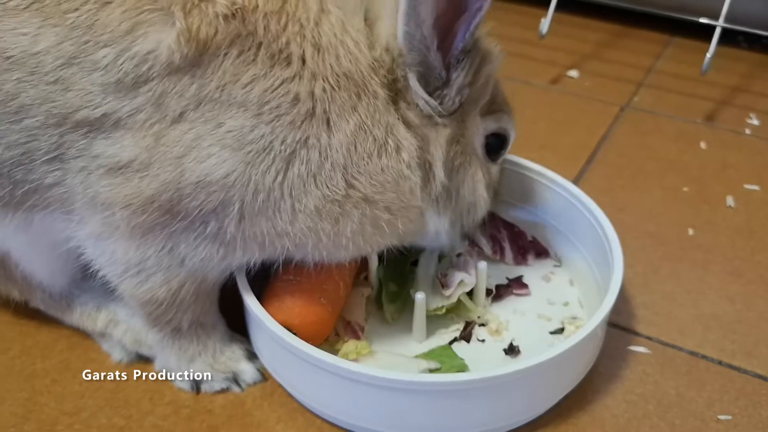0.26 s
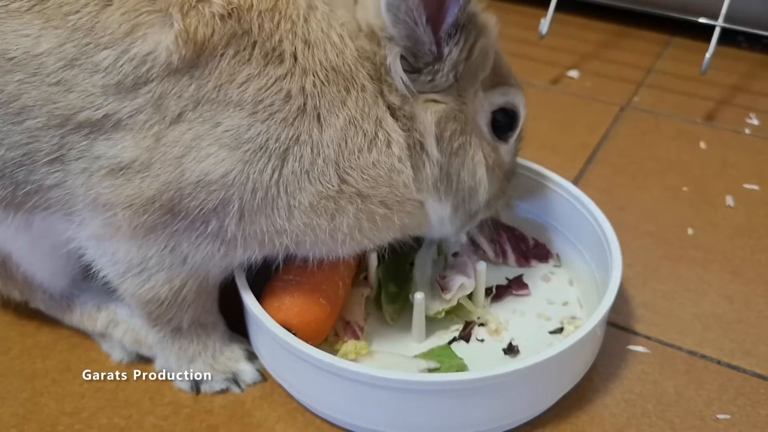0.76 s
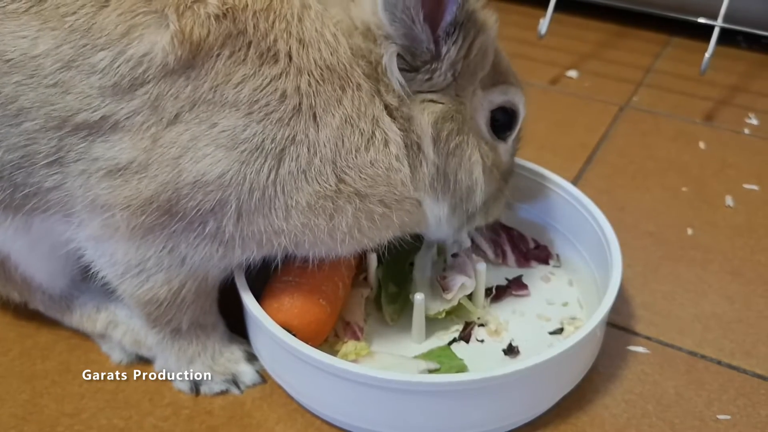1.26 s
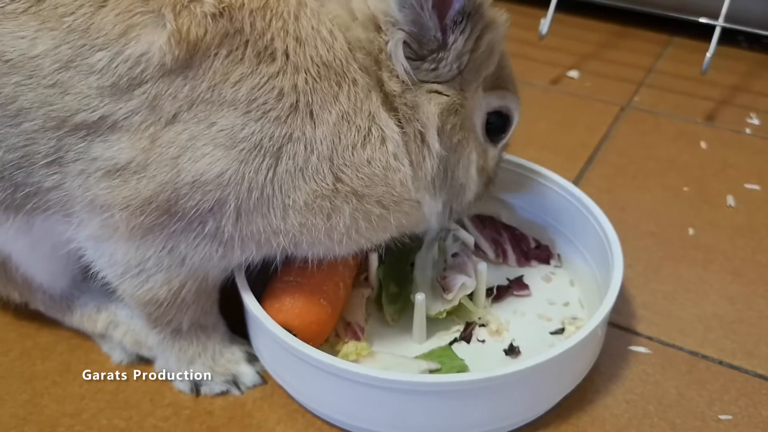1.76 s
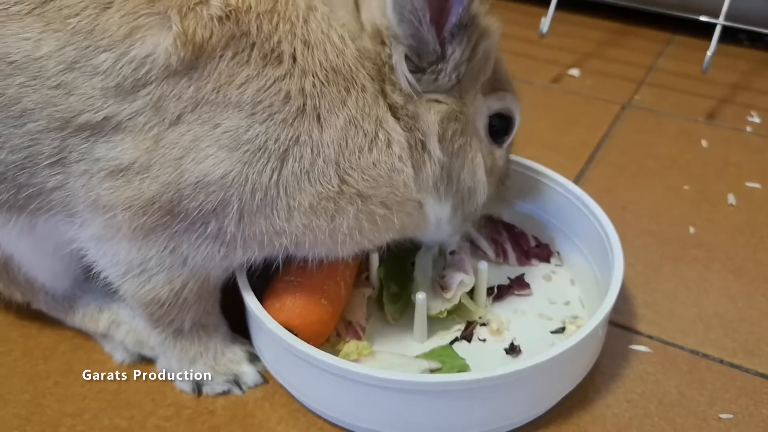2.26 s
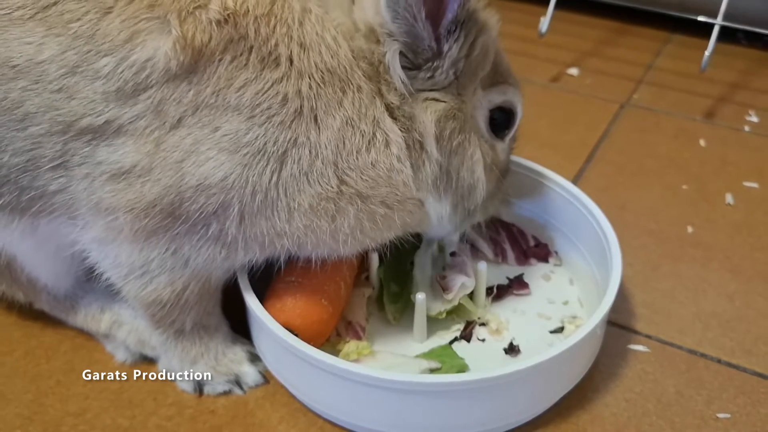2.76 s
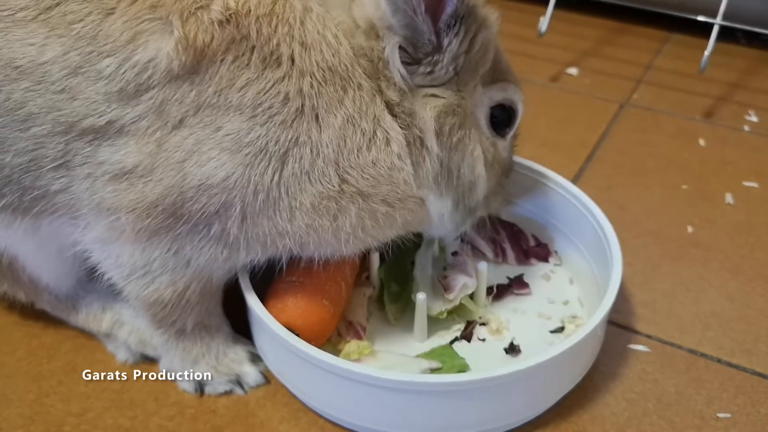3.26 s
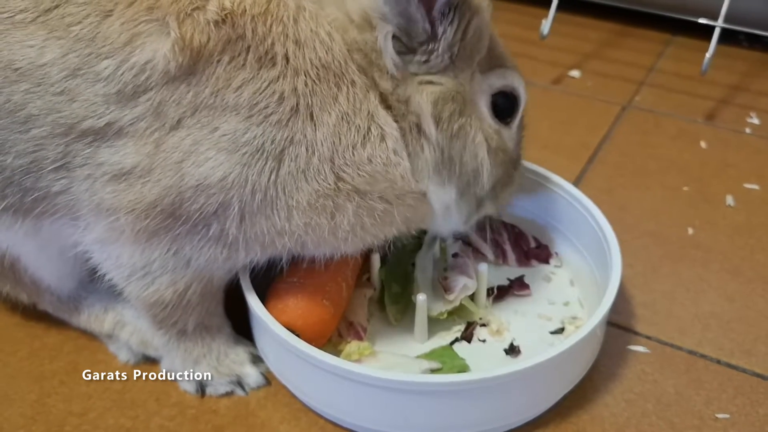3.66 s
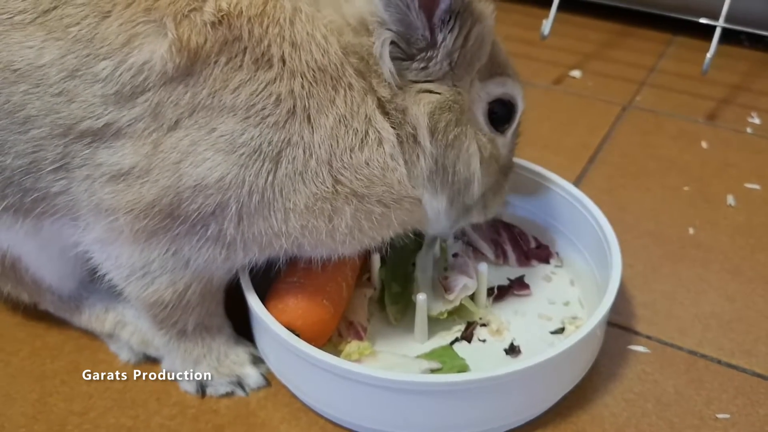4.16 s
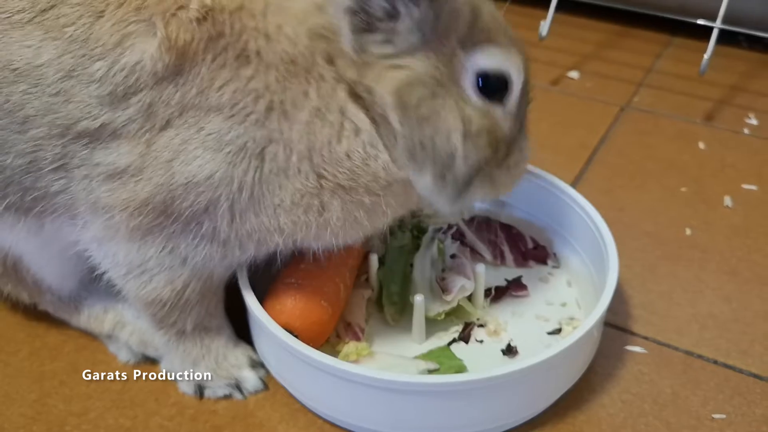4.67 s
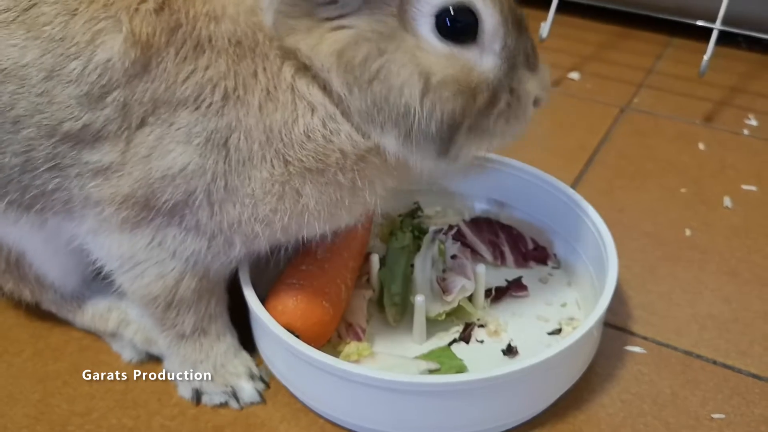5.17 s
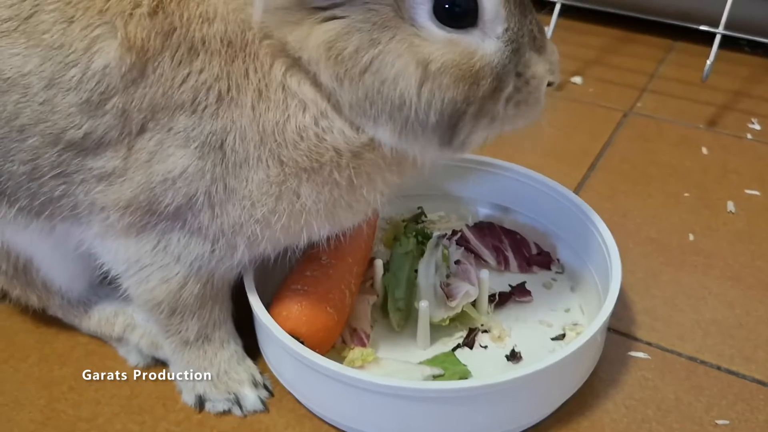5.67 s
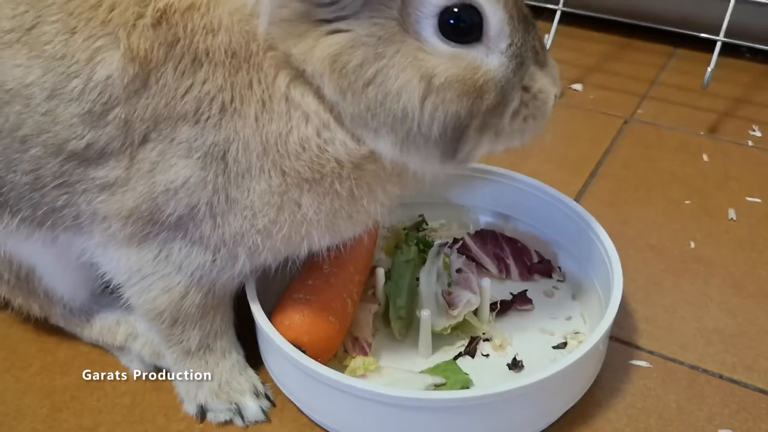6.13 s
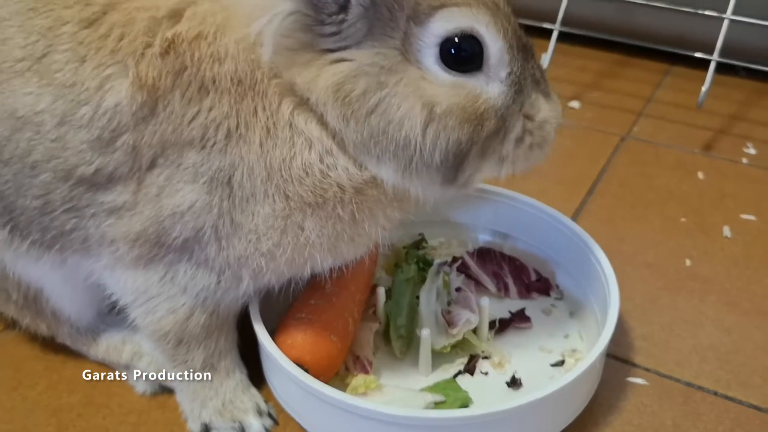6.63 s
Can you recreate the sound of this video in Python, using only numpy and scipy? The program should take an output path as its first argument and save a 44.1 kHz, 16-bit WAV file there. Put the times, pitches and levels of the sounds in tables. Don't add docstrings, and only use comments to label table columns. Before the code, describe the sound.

A rabbit eats salad from a plastic bowl on a tiled floor, very close to a small stereo microphone. Loud brittle crunches come in the first second, then a faint lull; firm bites and bright fibre snaps return from two seconds. After about five seconds only soft grinding, dull tooth knocks and small wet clicks remain. Deep distant traffic rumble and soft hiss run throughout.

```python
import sys
import numpy as np
from scipy import signal
from scipy.fft import rfft, irfft
from scipy.io import wavfile
from scipy.ndimage import uniform_filter1d

SR = 44100
rng = np.random.default_rng(int(sys.argv[2]) if len(sys.argv) > 2 else 0)


def store_pcm(level_fs):
    pcm = np.round(np.clip(level_fs, -1, 1) * 32767).astype(np.int16)
    wavfile.write(sys.argv[1], SR, np.atleast_2d(pcm).T)


def undo_db(level):
    steps = np.asarray(level, float) / 20
    return 10 ** steps


N = 304283

# mode_hz, width_hz, level_db
BOWL = [(2650, 82, 1), (3870, 410, -3), (5030, 130, -3), (5700, 120, 0), (7300, 220, 5), (8500, 660, -3.5)]
BRITTLE = (-30, -6)


def evened(x):
    return x / np.sqrt(np.mean(x ** 2) + 1e-20)


def read(points, hz):
    f, value = np.transpose(points)
    return np.interp(np.log(hz + 1), np.log(f + 1), value)


def add(mix, s, sound):
    part = mix[..., round(s * SR):][..., :sound.shape[-1]]
    part += sound[..., :part.shape[-1]]


def resonate(x, hz, width):
    turn = np.exp(2j * np.pi * hz * np.arange(x.shape[-1]) / SR)
    r = np.exp(-np.pi * width / SR)
    return 2 * (turn * signal.lfilter([1 - r], [1, -r], x / turn)).real


def cracks(shape, per_s, spread_db):
    size = undo_db(spread_db * np.minimum(rng.exponential(1, shape), 2.8))
    size = size * rng.choice([-1., 1.], shape)
    return size * (rng.random(shape) < per_s / SR)


def air(level_db=-54, patchy_db=1.6):
    # pitch_hz, density_db
    air_spectrum = [(8.8, -31), (15, -1.5), (59, -7), (102, -15.5), (141, -11.5), (477, -27.5),
                    (1760, -25.5), (4340, -33.5), (14300, -40.5), (15600, -39)]
    # pitch_hz, likeness (-1 to 1)
    coherence = [(60, 0.98), (150, 0.92), (380, -0.1), (950, -0.22), (2380, 0.22), (5980, -0.26),
                 (15000, -0.05)]
    # pitch_hz, width_hz, level_db
    housing = [(1330, 170, -2.5), (1750, 170, 1.5), (2650, 110, 1.2)]
    frames, hz = N // 512 + 5, np.fft.rfftfreq(2048, 1 / SR)
    a, b, c, d, patches = rng.standard_normal((frames, 1025, 5)).T
    patches = evened(uniform_filter1d(uniform_filter1d(patches, 20, 0), 8, 1))
    same = np.clip(read(coherence, hz), -1, 1)[:, None]
    left = a + 1j * b
    right = same * left + np.sqrt(1 - same ** 2) * (c + 1j * d)
    colour_db = read(air_spectrum, hz) + sum(db * np.exp(-((hz - f) / w) ** 2) for f, w, db in housing)
    z = np.array([left, right]) * undo_db(colour_db[:, None] + patchy_db * patches)
    return undo_db(level_db) * evened(signal.istft(z, nperseg=2048, noverlap=1536)[1][:, :N])


def traffic(steadiness=0.91, fade_db=11.5):
    # mode_hz, width_hz
    hum_modes = [(25, 5.8), (47, 12), (68, 7.7), (128, 10.3), (78, 9), (146, 14)]
    steady_levels = [-58, -61.5, -61, -68, -72, -72]
    # peak_s, half_length_s, peak_db, mode_hz
    passes = [(0.0, 0.054, -43.5, 25), (0.55, 0.37, -57, 25), (2.18, 0.087, -44, 25), (2.5, 0.24, -43, 25),
              (3.423, 0.34, -42.5, 25), (3.967, 0.1, -47, 25), (5.1, .35, -53.5, 25),
              (5.667, 0.078, -47, 25), (6.13, 0.15, -45.5, 25), (6.65, 0.16, -48, 25),
              (1.7, 0.19, -50.5, 47), (1.946, 0.15, -49.5, 47), (2.27, 0.21, -53, 47),
              (2.88, 0.22, -50, 47), (3.59, 0.16, -49, 47), (4.047, 0.056, -45.5, 47),
              (5.67, 0.11, -51, 47), (6.42, 0.18, -52.5, 47), (6.69, 0.096, -54.5, 47),
              (1.066, 0.1, -42, 68), (1.46, 0.4, -52, 68), (5.093, 0.084, -50.5, 68),
              (2.958, 0.18, -50.5, 68), (4.7, 0.15, -51.5, 78), (4.3, .15, -55, 68), (3.75, .1, -55, 68),
              (5.68, 0.34, -52, 68), (6.596, 0.13, -50.5, 68), (0.2, 0.24, -56, 128),
              (2.85, 0.12, -59, 128), (3.8, .12, -61, 128), (3.58, 0.08, -58, 128), (3.52, 0.1, -55, 146),
              (3.95, .1, -62, 146), (3.35, .08, -61, 146), (4.334, 0.3, -56.5, 128)]
    t, out = np.arange(N // 256 + 2) * 256 / SR, np.zeros(N)
    for (hz, width), steady_db in zip(hum_modes, steady_levels):
        ring = resonate(resonate(rng.standard_normal(N), hz, width), hz, width)
        beat = np.sqrt(abs(uniform_filter1d(evened(ring) ** 2, size=2600)) + 0.015)
        swells = [undo_db(db - fade_db * ((t - s) / half) ** 2)
                  for s, half, db, f in passes if abs(f - hz) < hz / 14]
        level = np.sqrt(undo_db(steady_db) ** 2 + sum(np.square(swells)))
        out += np.interp(np.arange(N) / SR, t, level) * evened(ring / beat ** steadiness)
    return out


def room(x, wet_db=-13.5):
    # pitch_hz, t60_s
    decay = [(500, 0.21), (1500, 1), (2700, .8), (5200, 0.42), (8000, 0.45), (15000, 0.4)]
    # delay_s, level_db
    reflections = [
        [(.0011, -49), (.0026, -16.5), (.0047, -39)],
        [(.0007, -16), (.0032, -10), (.0058, -12.5)],
    ]
    taps = np.zeros((2, SR // 2))
    at = np.arange(300, SR // 2 - 20, 20) + rng.integers(0, 20, (2, (SR // 2 - 301) // 20))
    np.put_along_axis(taps, at, rng.choice([-1., 1.], at.shape), 1)
    hz, t, z = signal.stft(taps, SR, nperseg=256)
    tail = signal.istft(z * undo_db(-60 * t / read(decay, hz)[:, None]), SR, nperseg=256)[1]
    tail = undo_db(wet_db) * tail / np.linalg.norm(tail[0])
    tail[:, 0] = 1
    for side, echoes in enumerate(reflections):
        for s, db in echoes:
            tail[side, round(s * SR)] -= undo_db(db)
    return signal.fftconvolve(x, tail, axes=1)[:, :N]


def bowl_lift(hz, db):
    return sum(undo_db(db + g) / np.sqrt(1 + ((hz - f) / w) ** 2) for f, w, g in BOWL)


def breaks():
    # start_s, peak_db, ring_hz, left_right_db
    dry_snaps = [(0.5546, -20, 7700, 4.5), (0.5557, -24, 4900, -3), (0.5553, -29.5, 2650, -9),
                 (0.6028, -27.5, 3750, -6), (0.8552, -28.5, 3300, -10), (0.588, -22.5, 7700, 0.5),
                 (0.6033, -21, 7360, -3), (0.7865, -23, 7100, -3), (0.8556, -24, 5400, -3),
                 (0.8788, -37, 7300, 0), (0.8965, -43, 7300, -4), (2.2853, -41, 8000, 4),
                 (2.3018, -30, 5150, -6), (2.3172, -33, 6500, -1), (2.352, -40, 6100, -5),
                 (2.4867, -37, 7800, -3), (2.51, -36, 5300, -9), (2.5345, -28, 7800, -3),
                 (2.7, -23.5, 5040, -6), (3.103, -41, 4830, 1), (3.4842, -42, 11500, -4),
                 (3.933, -33.5, 6260, -8), (4.0847, -45, 6960, 1.5), (4.131, -36, 7850, -2),
                 (4.3532, -28, 5800, -2), (4.6006, -33.5, 7160, -2), (4.742, -38, 6340, -4),
                 (5.855, -43.5, 9080, 1), (6.3677, -41.5, 6200, -9)]
    # start_s, peak_db, ring_hz, left_right_db
    juicy_snaps = [(0.7865, -28, 5030, -6), (1.2295, -45, 7300, -5), (1.2582, -38.5, 6660, -7),
                   (2.2567, -41, 8950, -2), (2.4703, -41, 7240, 1), (2.6642, -25.5, 5030, -3),
                   (3.07, -41.5, 7550, 1), (3.453, -41, 7700, 5), (3.677, -43, 9200, -9),
                   (3.6985, -34, 8000, -3), (3.721, -36, 7600, -2), (3.8691, -40, 11560, -2),
                   (3.8897, -29.5, 7800, -1), (3.9174, -38, 7100, 3), (4.122, -37, 7300, -6),
                   (4.304, -43, 6950, 6), (4.327, -27, 7200, 2), (4.559, -31.5, 10600, -7),
                   (4.651, -45, 8860, -9), (6.6322, -48, 5630, -7)]
    # start_s, peak_db, ring_hz
    ticks = [(0.9636, -41.5, 6800), (1.031, -48, 4960), (1.0679, -45, 2930), (2.096, -44.5, 4800),
             (2.3789, -43, 8800), (2.617, -49, 5000), (2.646, -50, 6000), (2.679, -42, 5120),
             (2.847, -48, 4300), (2.894, -46, 8800), (3.039, -46, 6000), (3.281, -38, 7600),
             (3.5857, -56, 5000), (3.8081, -53, 4530), (4.049, -52, 6730), (4.1057, -43, 7500),
             (4.7017, -45.5, 4150), (5.8806, -44, 8600), (6.1074, -52, 5480), (6.4892, -50, 5600),
             (6.8594, -54, 9000)]
    # start_s, peak_db
    creak = [
        (3.312, -47),
        (3.318, -48),
        (3.326, -46),
        (3.3325, -38.5),
        (3.337, -42.5),
    ]
    # start_s, peak_db
    smacks = [(4.2375, -55), (5.173, -50), (5.391, -50.5), (5.735, -52), (6.2386, -57), (6.3474, -60),
              (6.595, -55)]
    # start_s, peak_db, ring_hz
    crackles = [(0.5378, -41, 6430), (0.552, -29, 6500), (0.5553, -18.5, 5850), (0.5883, -26, 5000),
                (0.611, -28.5, 7500), (0.6155, -29, 7850), (0.618, -38, 3500), (0.7715, -36, 4010),
                (0.7715, -38, 7800), (0.7832, -27.5, 6900), (0.786, -28, 9000), (0.7935, -31, 5200),
                (0.802, -39, 7500), (0.8557, -30, 7840), (0.8792, -39, 3500), (2.2565, -40, 5500),
                (2.2865, -36, 4600), (2.535, -31.5, 5200), (2.6657, -33, 7200), (2.6985, -30, 7500),
                (2.7005, -28, 6500), (2.7165, -45, 7500), (3.4603, -41, 9000), (3.49, -42, 11000),
                (3.5869, -51, 8800), (3.603, -55, 9500), (3.8084, -50, 8800), (3.911, -44, 9000),
                (4.0912, -42, 7140), (4.2678, -54, 9000), (4.3095, -37, 6960), (4.344, -36, 9000),
                (4.362, -37, 6500), (4.5237, -46, 8760), (4.538, -39, 9000), (4.5595, -33, 7500),
                (4.567, -32, 9200), (4.572, -30, 9500), (4.577, -37, 8800), (4.6539, -43, 9000),
                (5.0197, -52, 4590), (5.2362, -55, 3740), (5.7136, -57, 3730), (5.738, -51, 8800),
                (5.904, -54, 9000), (5.992, -55, 9000), (6.215, -59, 4100), (6.2374, -50, 5840),
                (6.3542, -51, 9100), (6.5, -52, 5500), (6.602, -53, 9000), (6.745, -52, 5800),
                (6.762, -53, 9000), (6.795, -52, 5500)]
    # start_s, peak_db, ring_hz
    knocks = [(0.783, -45, 1390), (3.669, -50, 1320), (3.677, -39.5, 1430), (3.699, -45, 1670),
              (3.869, -51, 1560), (3.885, -44, 1310), (4.092, -48, 1650), (4.123, -43.5, 1470),
              (4.295, -50, 1690), (4.318, -43, 1800), (4.328, -40, 1700), (4.543, -48, 1730),
              (4.567, -43, 1660), (4.575, -40, 1500), (5.24, -55, 950), (5.485, -60, 906),
              (5.65, -56.5, 900), (5.71, -55, 885), (5.75, -61, 850), (5.96, -57.5, 900), (6.203, -52, 900),
              (6.225, -56, 1000), (6.26, -55.5, 950), (6.48, -54, 950), (6.65, -55, 1100),
              (6.702, -53, 895), (6.725, -52, 800), (6.745, -55, 900)]
    # start_s, peak_db, ring_hz, left_right_db
    splits = [(0.5555, -24, 7000, 3), (0.6035, -28, 6000, 0), (0.7868, -24.5, 7500, 2),
              (0.8792, -33, 7500, 0), (2.3015, -34, 9500, -2), (2.3175, -40, 4000, -2),
              (2.429, -50, 1500, -2), (2.4697, -42, 4000, -1), (2.487, -34.5, 11000, -4),
              (2.509, -36, 4000, -2), (3.3185, -48, 7600, -2), (3.326, -47, 7600, -2),
              (3.3325, -46, 7600, -2), (3.338, -44, 7600, -2), (3.4535, -42, 11000, -3),
              (3.704, -42, 8000, -2), (3.7155, -43, 9000, -2), (3.89, -34, 12000, 0), (3.934, -40, 3000, 2),
              (4.3285, -38, 11000, -1), (4.344, -38, 13000, -3), (4.354, -38, 8500, -2),
              (4.557, -37, 10600, -4), (5.24, -56, 1750, -3), (5.52, -56, 1700, -3), (5.99, -56, 2050, -3),
              (6.217, -53, 1750, -3), (6.288, -53, 1750, -3), (4.328, -50, 1000, -3), (4.36, -48, 1100, -3),
              (5.215, -55, 900, -3), (5.465, -55, 750, -3)]
    tick, knock = (-21.5, -15), (-34, -27)
    aside_db = -3.5
    rows = [(*row, -26, -12) for row in dry_snaps]
    rows += [(*row, -15, -10) for row in juicy_snaps]
    rows += [(*row, aside_db, *tick) for row in ticks]
    rows += [(*row, 3450, aside_db, -11.5, -28) for row in creak]
    rows += [(*row, 2650, aside_db, -1.5, -19) for row in smacks]
    rows += [(*row, -3, *tick) for row in crackles]
    rows += [(*row, aside_db, *knock) for row in knocks]
    rows += [(*row, *(BRITTLE if row[2] > 2500 else knock)) for row in splits]
    return rows


def snaps(tear_s=.0011, detune=0.044, bowl_db=-9.0):
    thin_damping, thick_damping = .17, .28
    thud_hz, thud_width_hz = 1350, 900
    break_size = 7
    t, out, rows = np.arange(900) / SR, np.zeros((2, N)), breaks()
    tears = rng.standard_normal((200, 3, 900))
    shakes_db = 4 * rng.standard_normal((200, 2, len(BOWL)))
    high = signal.butter(2, [2400, 14000], "band", fs=SR, output="sos")
    lead = 3 * tear_s
    for (s, db, hz, pan_db, thud_db, fizz_db), (left, right, both), shake_db in zip(rows, tears, shakes_db):
        shorter = .4 if (thud_db, fizz_db) == BRITTLE else 1
        burst = np.exp(-.5 * ((t - lead) / (tear_s * shorter)) ** 2)
        tear = burst * np.array([both + 1.1 * left, both + 0.51 * right])
        at = round(lead * SR) + np.array([0, round(2 * both[0])])
        tear[[0, 1], at] += break_size * np.sign(both[1])
        damping = np.interp(db, [-42, -34], [thin_damping, thick_damping])
        sides = zip(tear, (hz * (1 + detune), hz * (1 - detune)))
        ring = np.array([resonate(resonate(x, f, damping * f), f, damping * f) for x, f in sides])
        bowl = sum(undo_db(g + shake_db[:, k, None]) * evened(resonate(tear, f, w))
                   for k, (f, w, g) in enumerate(BOWL))
        fizz = undo_db(fizz_db - 3.5) * evened(signal.sosfilt(high, tear))
        crack = evened(ring) + fizz + undo_db(bowl_db) * min(hz / 4000, 1) ** 2 * evened(bowl)
        thud = resonate(resonate(tear, thud_hz, thud_width_hz), thud_hz, thud_width_hz)
        sound = crack / abs(crack).max() + undo_db(thud_db + 2.5) * thud / abs(thud).max()
        add(out, s - lead + .0012, undo_db(db) * sound * undo_db([[pan_db / 2], [-pan_db / 2]]))
    return out


def chews(focus_db=9, octaves=0.81):
    # pitch_hz, density_db
    leaf_spectrum = [(1410, -47), (2400, -6), (2660, -2.5), (3080, 0.5), (4020, -0.5), (4420, -4.5),
                     (5010, -1.5), (7410, -3.5), (12500, -5), (14700, -1), (15600, -9)]
    # time_s, pitch_hz
    crispness = [(0.1, 5200), (0.4, 4800), (0.53, 5960), (0.9, 5830), (1.3, 5200), (2.03, 4900),
                 (2.25, 6000), (2.72, 6100), (2.9, 4600), (3.08, 5730), (3.33, 5200), (3.46, 8500),
                 (4.4, 7900), (4.56, 9000), (4.68, 8500), (4.78, 5500), (5.15, 4050), (6.9, 3970)]
    # start_s, length_s, hardest_squeeze (0-1), crush_db, grind_db
    firm_chews = [(0.53, 0.037, 0.7, -46.5, -56), (0.584, 0.05, 0.55, -40.5, -48.5),
                  (0.759, 0.051, 0.64, -38.5, -50.5), (0.8, 0.069, 0.35, -51, -60),
                  (0.839, 0.051, 0.75, -43, -53.5), (1.001, 0.092, 0.68, -52.5, -66),
                  (1.202, 0.079, 0.9, -58, -64), (2.24, 0.092, 0.62, -44, -58.5),
                  (2.313, 0.078, 0.55, -55.5, -62), (2.452, 0.103, 0.42, -46.5, -58),
                  (2.64, 0.11, 0.15, -47.5, -59), (2.875, 0.048, 0.65, -55, -62),
                  (2.996, 0.12, 1, -56, -66), (3.243, 0.069, 0.48, -54, -63),
                  (3.306, 0.049, 0.57, -51, -56.5), (3.417, 0.096, 0.84, -52.5, -62.5),
                  (3.661, 0.079, 0.63, -50, -55.5), (3.849, 0.13, 0.36, -51.5, -55),
                  (4.069, 0.091, 0.62, -45, -54), (4.28, 0.1, 0.8, -43, -52),
                  (4.509, 0.088, 0.82, -42, -49.5), (4.631, 0.045, 0.57, -48, -58.5)]
    # start_s, length_s, crush_db, grind_db
    pulp_chews = [(0.073, 0.1, -60.5, -58), (0.298, 0.067, -60.5, -57), (0.62, .09, -58, -60),
                  (2.708, .04, -60, -58), (0.872, 0.046, -63, -68), (0.942, 0.053, -65, -69),
                  (1.135, 0.065, -65, -83), (1.32, 0.045, -65, -76), (1.801, 0.066, -62, -66),
                  (1.978, 0.093, -61.5, -57), (2.078, 0.074, -66, -84), (4.375, .09, -58, -62),
                  (4.15, .08, -60, -64), (4.724, 0.1, -60.5, -60.5), (4.928, 0.14, -60.5, -63),
                  (5.194, 0.097, -62.5, -59), (5.358, 0.058, -62, -62.5), (5.45, 0.065, -60, -59.5),
                  (5.566, 0.074, -67, -76), (5.698, 0.074, -58, -61.5), (5.845, 0.068, -60, -73),
                  (5.932, 0.086, -61, -64), (6.19, 0.09, -61, -59), (6.33, 0.048, -75, -67),
                  (6.453, 0.071, -61, -64.5), (6.592, 0.081, -82, -65.5), (6.688, 0.075, -59, -58.5)]
    cheek_base_hz, cheek_power, cheek_top_hz, cheek_width_hz = 1560, 1.64, 1510, 840
    shared = cracks(N, per_s=2500, spread_db=1.5)
    cells = evened(shared) + 6.3 * evened(cracks((2, N), per_s=5000, spread_db=4.0))
    slips = uniform_filter1d(rng.standard_normal(N), size=260)
    cells = cells * undo_db(2.2 * evened(slips))
    rub = 1.46 * evened(shared) + rng.standard_normal(N) + 1.63 * rng.standard_normal((2, N))
    rub = rub * undo_db(3.3 * evened(slips))
    out = np.zeros((2, N))
    pulp = [(s, length, 0.65, *levels) for s, length, *levels in pulp_chews]
    for s, length, hardest, crush_db, grind_db in firm_chews + pulp:
        crisp_hz = np.interp(s + length / 2, *np.transpose(crispness))
        cheek_hz = min(cheek_base_hz * (crisp_hz / 6000) ** cheek_power, cheek_top_hz)
        u = np.linspace(0, 1, round(length * SR))
        phase = np.interp(u, [0, np.clip(hardest, .1, .9), 1], [0, .5, 1])
        squeeze = np.sin(np.pi * phase) ** 0.92
        at = slice(round(s * SR), round(s * SR) + len(u))
        hz = np.fft.rfftfreq(len(u), 1 / SR)
        focus = np.exp(-.5 * (np.log2((hz + 1) / crisp_hz) / octaves) ** 2)
        colour = undo_db(read(leaf_spectrum, hz * (6000 / crisp_hz) ** 1.03) + focus_db * focus)
        leaf = irfft(rfft(cells[:, at]) * colour * (2.5 + bowl_lift(hz, db=-1.0)), len(u))
        cheek = resonate(resonate(rub[:, at], cheek_hz, cheek_width_hz), cheek_hz, cheek_width_hz)
        grind = undo_db(grind_db) * evened(cheek) * undo_db([[-1.5], [1.5]])
        add(out, s, evened(squeeze) * (undo_db(crush_db) * evened(leaf) + grind))
    return out


def scene():
    return room(undo_db(-5.5) * chews() + undo_db(2.5) * snaps()) + air() + undo_db(-2.5) * traffic()


def drop_weak_treble(x, range_db=16.5, from_hz=9600):
    lag = 247
    padded = np.pad(x, ((0, 0), (lag, 2048 - (N + lag) % 1024)))
    hz, t, z = signal.stft(padded, SR, nperseg=256, noverlap=128)
    steps = z.shape[2] // 8 * 8
    power = (abs(z[:, :128, :steps]) ** 2).sum(0)
    power = power.reshape(16, 8, -1, 8).sum(1)
    keep = power > power.max(2, keepdims=True) / undo_db(2 * range_db)
    keep = keep.reshape(16, -1).repeat(8, 0)
    z[:, :128, :steps] *= keep | (hz[:128, None] < from_hz)
    return signal.istft(z, SR, nperseg=256, noverlap=128)[1][:, lag:lag + N]


def roll_off(x):
    return signal.sosfilt(signal.butter(12, 16500, fs=SR, output="sos"), x)


def record(dry):
    edge = signal.firwin(801, 15780, window=("kaiser", 8), fs=SR)
    limited = signal.oaconvolve(dry, edge[None], "same")
    offset = -.0013
    return roll_off(drop_weak_treble(limited) + offset)


dry = scene()
out = record(dry)
store_pcm(out)
```